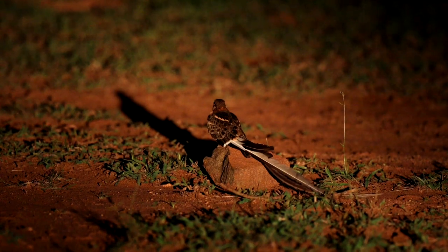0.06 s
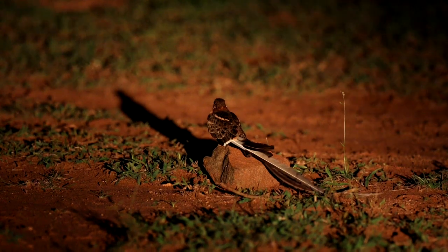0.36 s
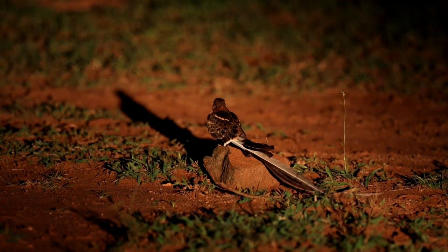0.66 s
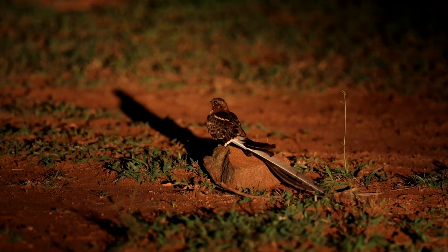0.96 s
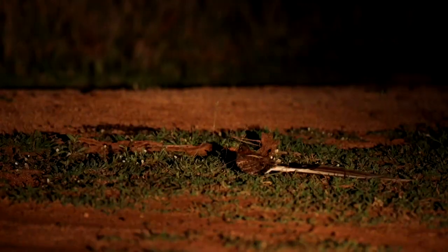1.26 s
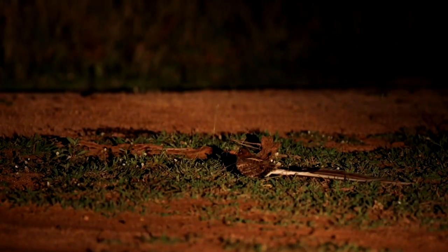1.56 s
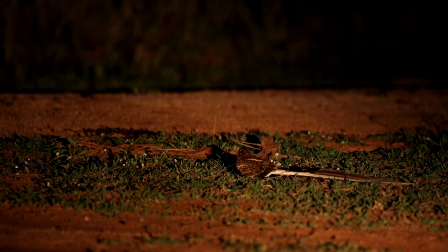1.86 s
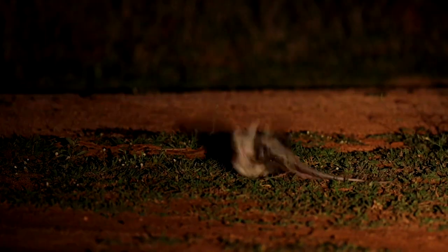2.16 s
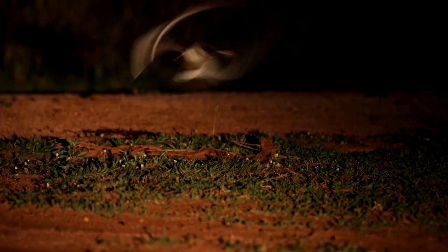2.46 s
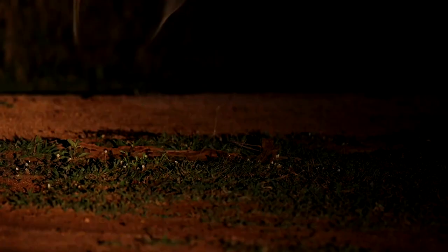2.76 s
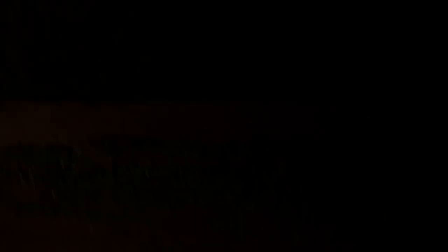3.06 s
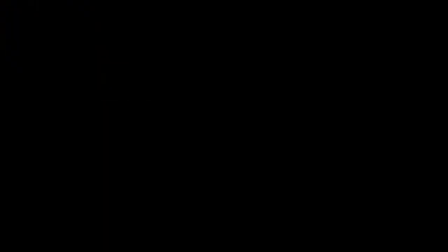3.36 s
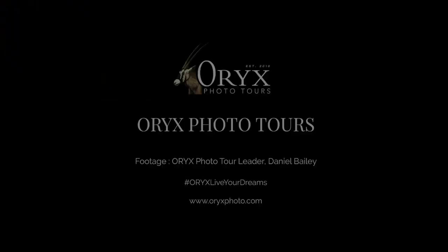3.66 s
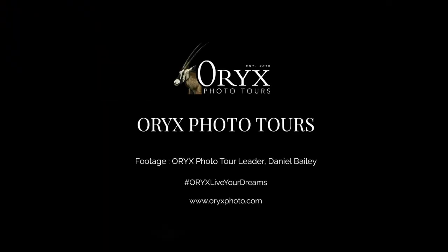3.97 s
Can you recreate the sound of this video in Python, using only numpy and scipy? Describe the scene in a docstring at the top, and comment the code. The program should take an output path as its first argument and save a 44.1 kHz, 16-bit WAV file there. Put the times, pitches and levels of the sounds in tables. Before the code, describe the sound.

Low, fluttering wind thumps on the microphone over faint night crickets, then everything fades out.

```python
"""Crickets and wind in night grassland.

Gusts buffet the microphone with low, fluttering thumps; the hardest makes the limiter duck.
Crickets chirp near 4 kHz, each wing stroke a short falling pulse, a few close by and many far off.
A higher insect trills twice, and faint calls, perhaps frogs, sit in a soft hiss.
Dry ticks and a rustle of grass come near the end, as everything fades out."""
import sys
import numpy as np
from scipy import signal
from scipy.fft import rfft, irfft
from scipy.io import wavfile
from scipy.ndimage import uniform_filter1d, minimum_filter1d

SR = 44100
rng = np.random.default_rng(int(sys.argv[2]) if len(sys.argv) > 2 else 0)


def to_wav(sig):
    """Store sig (one row per channel, or 1-D mono) as 16-bit WAV at the path in sys.argv[1].

    Samples outside -1..1 are clipped; the rate is SR.
    """
    pcm = np.clip(np.atleast_2d(sig), -1, 1) * 32767
    pcm = np.round(pcm).astype(np.int16)
    wavfile.write(sys.argv[1], SR, pcm.T)  # frames by channels


N = 176400
TIME = np.arange(N) / SR


def from_db(db):
    """Decibels to gain."""
    return 10 ** (np.asarray(db) / 20)


def rms_one(x):
    """Scale to unit power."""
    return x / np.sqrt(np.mean(x ** 2) + 1e-20)


def curve(rows, at=TIME):
    """Read a breakpoint envelope along straight lines."""
    return np.interp(at, *np.transpose(rows))


def noise(spectrum):
    """Noise of unit power with the given colour."""
    hz, db = np.transpose(spectrum)
    bins = np.maximum(np.fft.rfftfreq(N, 1 / SR), 1)
    colour = from_db(np.interp(np.log(bins), np.log(hz), db))
    return rms_one(irfft(rfft(rng.standard_normal(N)) * colour, N))


def add(out, start_s, sound):
    """Mix a sound in at its start time."""
    i = int(start_s * SR)
    a, b = max(i, 0), min(i + len(sound), N)
    if b > a:
        out[a:b] += sound[a - i:b - i]


def swirls(times, gains, pitches, slope, reach_s=.015):
    """Each passing swirl of air gives one smooth swing of pressure, lopsided at random."""
    out, t = np.zeros(N), np.arange(-reach_s, reach_s, 1 / SR)
    taper = (1 - (t / reach_s) ** 2) ** 2
    for s, gain, hz, turn in zip(times, gains, pitches, rng.random(len(times))):
        u = 2 * np.pi * hz * t / slope
        swell = (1 + u * u) ** (-(slope + 1) / 2)
        swing = np.cos((slope + 1) * np.arctan(u) + 2 * np.pi * turn)
        add(out, s - reach_s, gain * swell * swing * taper)
    return out


def buffets(wake_count=4, wake_spread_s=.0045, wake_octaves=.25, slope=3.74):
    """Each thump is one big swirl in a wake of smaller ones; the stronger its front, the sharper."""
    # Hard hits of air, trimmed in level and pitch below: time_s, body_db, pitch_hz, front_db
    hits = [(0.025, -6.5, 160.0, -42), (0.078, -15.5, 210.0, -42), (0.103, -9, 169, -34.5),
            (0.216, -2.5, 145, -46), (0.331, -15.0, 150.0, -40), (0.382, -3, 156, -42),
            (0.497, -4, 153.5, -42), (0.673, -19.5, 230.0, -52), (0.827, -2, 167, -29),
            (0.943, -17, 213, -38), (0.955, -12.5, 211, -38), (1.074, -7.5, 126, -42),
            (1.159, -16, 200.0, -41), (1.254, -13.5, 160.0, -52), (1.395, -8, 202, -48.5),
            (1.427, -8, 223, -37), (1.483, -5.5, 198, -37.5), (1.53, -4, 174, -43), (1.56, 0.5, 243, -25.5),
            (1.596, -16, 236, -30.5), (1.615, -4, 183, -43), (1.658, -30.5, 216, -36.5),
            (1.827, -11, 241, -35), (1.881, -8.5, 225, -39), (1.93, -5, 205, -38), (1.964, -3, 257, -27),
            (2.227, 6, 245, -6.5), (2.24, -2.5, 244, -9.5), (2.371, -3.5, 201, -28),
            (2.392, -3, 247, -18.5), (2.411, 1.5, 249, -18), (2.451, -7, 248, -14.5),
            (2.459, -1.5, 190.0, -23.5), (2.503, -2.5, 181, -26), (2.554, 0.5, 237.3, -17),
            (2.574, -7.5, 250, -20.5), (2.594, 0.5, 252, -26.5), (2.629, -7, 250, -22.5),
            (2.655, -2, 180.0, -30), (2.717, -10, 249, -35), (2.743, 0.5, 252, -18),
            (2.833, -2, 243, -10.5), (2.846, -7, 250, -19), (2.869, 0.5, 210.0, -22.5),
            (2.882, -7, 251, -18), (2.948, -1.5, 251.6, -24), (2.98, -1, 250, -18.5), (2.996, -3, 211, -29),
            (3.051, -4.5, 220.0, -30), (3.181, -1.0, 220.0, -19.5), (3.409, -10, 250, -26),
            (3.506, -1, 211, -25), (3.571, -5, 220.0, -23.5)]
    s, db, hz, front_db = np.transpose(hits)
    out = swirls(s, from_db(db - 2.5), hz * .96, slope)
    front_hz = 600 * 2 ** (.016 * (front_db + 26))
    out += swirls(s, from_db(front_db + 1.5), front_hz, slope=3.0)
    scatter = np.clip(rng.standard_normal((len(s), wake_count, 2)), -2, 2)
    for when, pitch in scatter.transpose(1, 2, 0):
        wake_hz = hz * 2 ** (wake_octaves * pitch)
        out += swirls(s + wake_spread_s * when, from_db(db - 11.5), wake_hz, slope)
    return out


def wind(eddies_per_s=400, spread_db=2.17, spread_octaves=.48, flutter_hz=30.01, flutter_db=7):
    """Dense eddies grow louder and higher with the gust and come in fluttering clumps, over a rumble."""
    # Strength of the wind at the microphone: time_s, level_db
    gust = [(0.0, -17), (0.19, -35.5), (0.38, -20), (0.41, -29.5), (0.5, -21.5), (0.53, -42.5), (0.58, -21),
            (0.64, -36.5), (0.68, -17), (0.75, -31.5), (0.82, -17), (0.89, -45.5), (0.9, -23.5),
            (0.97, -20), (1.05, -28), (1.27, -21), (1.34, -37), (1.38, -18.5), (1.97, -18.5), (2.12, -33),
            (2.15, -16), (2.19, -24), (2.23, -2), (2.3, -23), (2.4, -12), (2.52, -17), (2.54, -12.5),
            (2.67, -23), (2.73, -14), (2.8, -19.5), (2.87, -9.5), (2.96, -23.5), (2.98, -15), (3.31, -17),
            (3.49, -18), (3.54, -32.5), (3.57, -20.5), (3.71, -23.5)]
    # Eddy pitch at the usual gust strength, rising with wind speed: time_s, pitch_hz
    eddy_pitch = [(0, 150.7), (1.2, 146.8), (1.5, 170), (1.95, 165), (2.1, 137.2), (2.23, 194.8),
                  (2.5, 178.5), (2.85, 188), (3.1, 172.8), (3.6, 184.2)]
    # Colour of the low rumble: frequency_hz, level_db
    rumble_colour = [(20, -25), (40, -9), (70, -4.5), (110, 4), (180, -1), (300, -17.5), (600, -43),
                     (1500, -78.5)]
    usual_db, octaves_per_db = -22.5, .0534
    jitter, scatter = rng.random(4000), rng.standard_normal((4000, 2))
    s = (np.arange(len(jitter)) + jitter) / eddies_per_s
    size, pitch = np.clip(scatter[s < N / SR].T, -2, 2)
    s = s[s < N / SR]
    flutter = np.interp(s * flutter_hz * 2, np.arange(1000), rng.uniform(-1, 1, 1000))
    octaves = spread_octaves * pitch + octaves_per_db * (curve(gust, s) - usual_db)
    gains = from_db(spread_db * size + flutter_db * flutter)
    eddies = rms_one(swirls(s, gains, curve(eddy_pitch, s) * 2 ** octaves, slope=3.45))
    rumble = noise(rumble_colour) * from_db(-28.5 + .7 * (curve(gust) - usual_db))
    return eddies * from_db(curve(gust) - 2.5) + rumble


def wing_stroke(hz, length_s, fall, overtones=()):
    """One closing of the wings: a tone that sinks as the stroke slows, brightest at its height."""
    u = np.linspace(0, 1, int(length_s * SR))
    phase = 2 * np.pi * (np.cumsum(hz * (1 + fall * (.5 - u))) / SR + rng.random())
    swell = np.sin(np.pi * u) ** 2
    sheen = sum(from_db(db) * np.sin(k * phase) for k, db in overtones)
    return swell * (np.sin(phase) + swell * sheen)


def add_chirp(out, start_s, hz, period_s, db, overtones, fall):
    """Mix in a run of four wing strokes, the first one softer."""
    for k, accent_db in enumerate([-6.5, 0, 0, 0]):
        stroke = wing_stroke(hz, length_s=.019, fall=fall, overtones=overtones)
        add(out, start_s + k * period_s, from_db(db + accent_db) * stroke)


def near_crickets():
    """Close crickets rub their wings in distinct chirps, each with its own brightness."""
    # Close chirps: start_s, pitch_hz, pulse_period_s, level_db, brightness_db
    chirps = [(.128, 4250, 0.024, -55, 2), (.379, 3865, 0.029, -48, 5.5), (.735, 3960, 0.024, -49, -10),
              (0.823, 4180, .027, -53, 3), (1.057, 3810, 0.028, -47.5, 6), (1.207, 3950, 0.03, -45.5, -2.5),
              (1.465, 3900, .029, -46.5, -5), (1.721, 4100, 0.033, -49.5, -7), (1.905, 3876, 0.027, -52, 1),
              (2.05, 3964, .028, -51, -1.5), (2.24, 3826, 0.031, -49, 0.5), (2.49, 3934, .031, -48.5, -4),
              (2.756, 3980, 0.026, -55.5, 0)]
    # Wing overtones, before a chirp's brightness is added: harmonic, level_db
    overtones = [(2, -14.5), (3, -19.5)]
    out = np.zeros(N)
    for start, hz, period, db, bright_db in chirps:
        timbre = [(k, level + bright_db) for k, level in overtones]
        add_chirp(out, start, hz, period, db, timbre, fall=.24)
    return out


def trilling_insect(jitter_s=.0022):
    """A higher insect trills in quick, slightly uneven wing strokes, swelling and sinking."""
    # Trills: start_s, length_s, pitch_hz, pulse_period_s, level_db
    trills = [(.91, 0.2, 4980, .0125, -58), (1.205, 0.19, 4980, .019, -60)]
    out = np.zeros(N)
    for start, length, hz, period, db in trills:
        for s in np.arange(0, length, period):
            gain = from_db(db) * np.sin(np.pi * s / length)
            onset = start + s + jitter_s * rng.standard_normal()
            add(out, onset, gain * wing_stroke(hz, length_s=.016, fall=.12))
    return out


def cricket_chorus(chirps_per_s=60, pitch_hz=4030, period_s=.029, spread_db=2.0):
    """Many far crickets, each at its own pitch and pace, merge into a shimmering band."""
    # Swell of the chorus: time_s, level_db
    swell = [(0, -60), (.8, -60), (1.4, -58.5), (1.8, -53), (2.2, -55.5), (2.6, -59), (3.1, -62),
             (3.7, -69.5)]
    # Wing overtones from afar: harmonic, level_db
    overtones = [(2, -18.5), (3, -30)]
    out = np.zeros(N)
    for k, (when, pitch, pace, size) in enumerate(rng.standard_normal((400, 4))):
        start = (k + .5 * when) / chirps_per_s - .1
        if start < N / SR:
            hz, period = pitch_hz * (1 + .035 * pitch), period_s * (1 + .08 * pace)
            add_chirp(out, start, hz, period, spread_db * size, overtones, fall=.13)
    return rms_one(out) * from_db(curve(swell))


def dry_ticks(grains_per_s=110, decay_s=.0027):
    """Tiny dry snaps, gone in a few milliseconds, among fainter grains of rustling grass."""
    # Ticks, lifted slightly below: time_s, level_db
    ticks = [(3.175, -45), (3.262, -46.5), (3.3114, -40.5), (3.3538, -50), (3.3962, -46), (3.4401, -52)]
    # Swell of the grass rustle: time_s, level_db
    rustle = [(3.05, -87), (3.18, -62), (3.33, -59), (3.45, -57), (3.6, -79)]
    # Colour of ticks and rustle: frequency_hz, level_db
    colour = [(500, -8.5), (2500, 0), (5000, -7.5), (7000, -7), (10000, -8.5), (15000, -19)]
    buffet_snap = (2.226, -42)  # lands on the hardest buffet
    impulses = (rng.random(N) < grains_per_s / SR) * rng.exponential(1, N) * from_db(curve(rustle))
    for s, db in [buffet_snap, *ticks]:
        impulses[int(s * SR)] += from_db(db + 1.5)
    envelope = signal.lfilter([1], [1, -np.exp(-1 / (decay_s * SR))], impulses + 1e-18)
    return envelope * noise(colour)


def far_calls(width_hz=120):
    """Soft notes, perhaps frogs, blurred by distance into narrow bands."""
    # Faint calls: middle_s, half_length_s, pitch_hz, level_db
    calls = [(.07, 0.061, 1940, -63), (.61, 0.1, 1914, -60.5), (0.733, 0.093, 1880, -67),
             (0.88, 0.079, 1920, -70), (1.113, 0.23, 1880, -68), (1.3, 0.066, 1883, -67),
             (1.693, 0.06, 1880, -61), (1.796, 0.17, 1686, -60.5), (2.12, 0.17, 1870, -64.5)]
    lowpass = signal.butter(2, width_hz / 2, fs=SR, output="sos")
    blur = rms_one(signal.sosfilt(lowpass, rng.standard_normal((2, N))))
    out = np.zeros(N)
    for middle, half_length, hz, db in calls:
        swell = np.cos(np.pi / 2 * np.clip((TIME - middle) / half_length, -1, 1)) ** 4
        phase = 2 * np.pi * hz * TIME
        out += from_db(db) * swell * (blur[0] * np.cos(phase) + blur[1] * np.sin(phase))
    return out


def night_air(air_db=-54.5, hiss_db=-66.5):
    """A bed of distant night ambience and even hiss, drifting gently in level."""
    # Colour of the far ambience: frequency_hz, level_db
    air_colour = [(100, 3), (700, 0), (1200, -3), (1550, -4), (1900, -2), (2200, -9), (3200, -13.5),
                  (4100, 5.5), (4700, -8.5), (5400, -29.5), (8000, -33), (16000, -47)]
    # Colour of the hiss: frequency_hz, level_db
    hiss_colour = [(1000, -4), (6000, -4.5), (9000, -2.5), (11000, 0), (13000, -4), (16000, -3)]
    # Level ride on the whole bed: time_s, gain_db
    ride = [(0, 0.5), (1.0, -1), (1.6, -2), (1.8, 0), (2.15, -0.5), (2.5, -3), (3.0, -4), (3.7, 6)]
    bed = from_db(air_db) * noise(air_colour) + from_db(hiss_db) * noise(hiss_colour)
    return bed * from_db(curve(ride))


def scene():
    """Wind and insects over the faint background of the night, in mono."""
    background = night_air() + dry_ticks() + far_calls()
    return (background + buffets() + wind() + near_crickets() + trilling_insect() + cricket_chorus())[None]


def record(dry):
    """A limiter ducks on peaks above full scale, the sound fades out and the top is cut."""
    attack_s, release_db_per_s = .0013, 44.5
    fade_end_s, fade_s, cutoff_hz = 3.807, .8, 15700
    over_db = np.maximum(20 * np.log10(np.abs(dry[0]) + 1e-9), 0)
    release_db = release_db_per_s * TIME
    held_db = np.maximum.accumulate(over_db + release_db) - release_db
    width = int(2 * attack_s * SR)
    gain_db = uniform_filter1d(minimum_filter1d(-held_db, width), width)
    fade = np.clip((fade_end_s - TIME) / fade_s, 0, 1) ** 2.13
    lowpass = signal.ellip(10, .1, 80, cutoff_hz, fs=SR, output="sos")
    return signal.sosfilt(lowpass, dry * from_db(gain_db) * fade)


dry = scene()
out = record(dry)
to_wav(out)
```